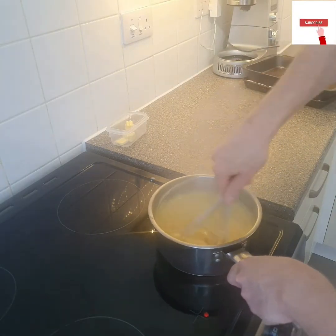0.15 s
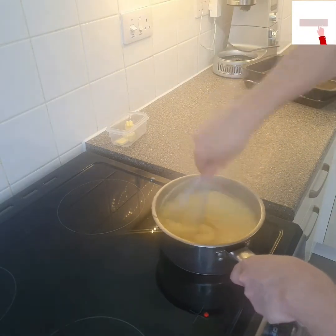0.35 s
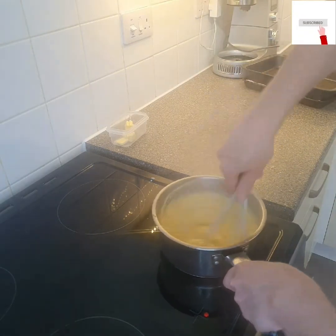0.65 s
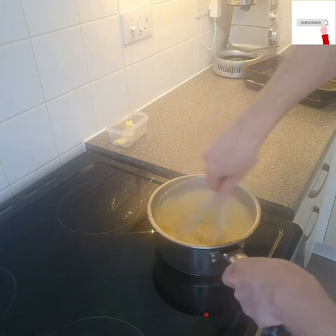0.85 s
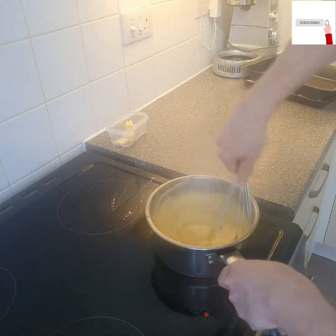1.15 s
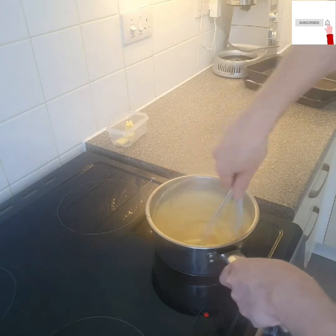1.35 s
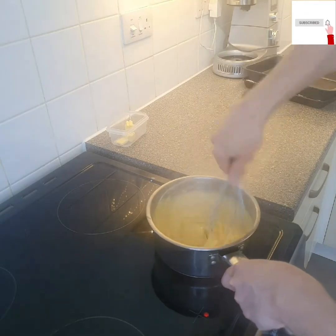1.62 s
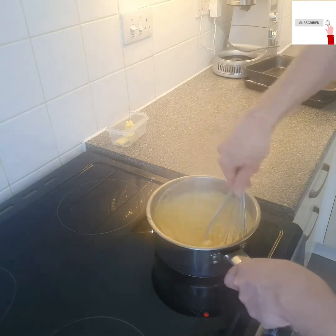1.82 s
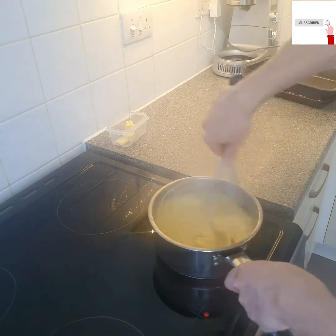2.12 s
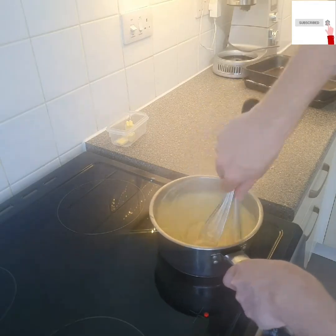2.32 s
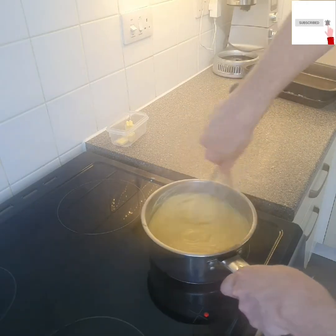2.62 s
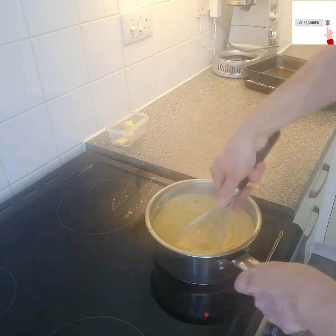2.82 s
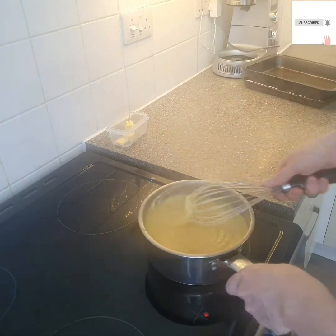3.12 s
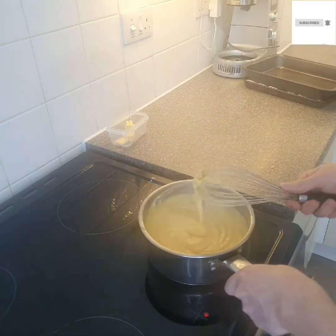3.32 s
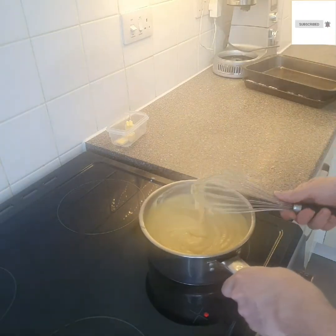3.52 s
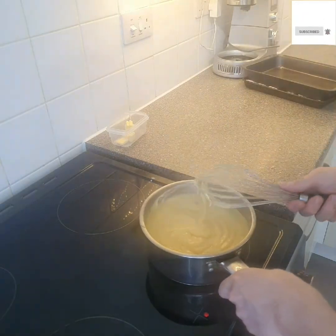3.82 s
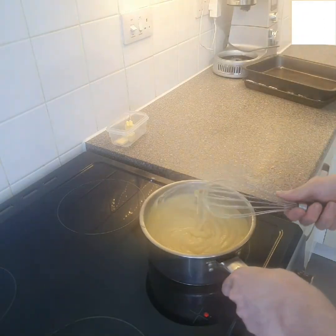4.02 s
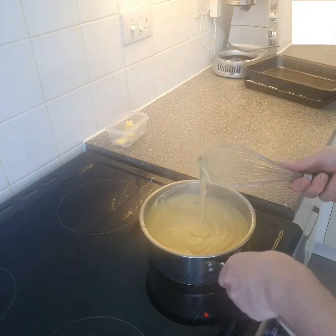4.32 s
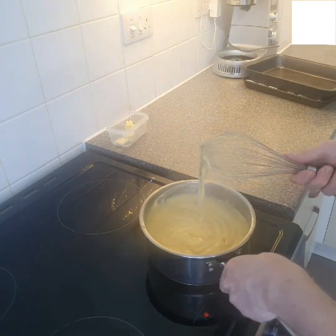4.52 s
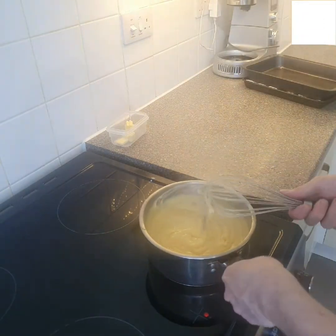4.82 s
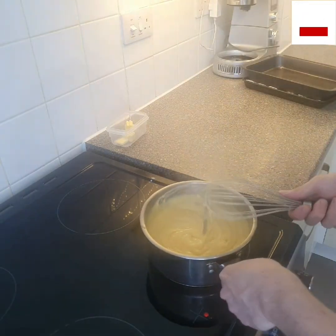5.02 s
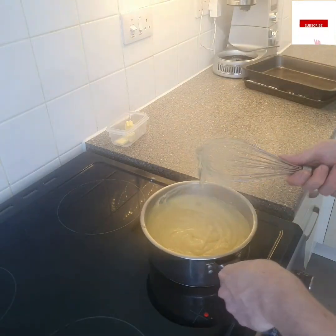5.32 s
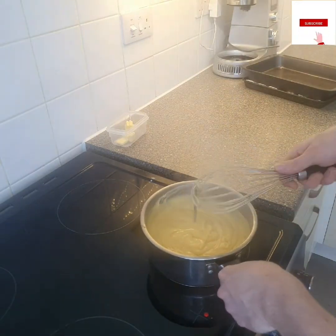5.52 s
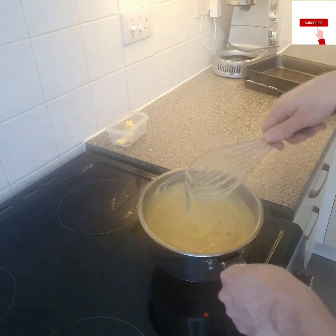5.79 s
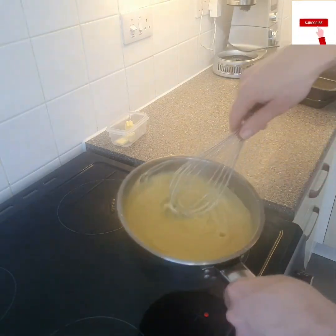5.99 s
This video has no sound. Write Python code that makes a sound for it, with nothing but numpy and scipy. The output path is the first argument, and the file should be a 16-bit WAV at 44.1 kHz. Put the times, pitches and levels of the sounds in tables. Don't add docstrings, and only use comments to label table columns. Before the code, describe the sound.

Rapid, uneven whisking comes first: bright wire clatter against a steel pan wall, scraping sweeps across its floor and a low pan hum. Then the whisk is lifted, leaving a quiet appliance drone broken by small ringing taps on the rim and heavier thuds of the pan on a glass hob, the loudest near the end. Two close microphones catch short, dense reflections from tiles and cupboards.

```python
import sys
import numpy as np
from scipy import signal
from scipy.fft import rfft, irfft, next_fast_len
from scipy.io import wavfile
from scipy.ndimage import uniform_filter1d

SR = 44100
rng = np.random.default_rng(int(sys.argv[2]) if len(sys.argv) > 2 else 0)


def store_wav(level_fs):
    pcm = np.round(np.clip(np.atleast_2d(level_fs), -1, 1) * 32767)
    wavfile.write(sys.argv[1], SR, pcm.T.astype(np.int16))


def boost_factor(decibels):
    exponent = np.asarray(decibels, float) / 20
    return 10 ** exponent


N = 271215
T = np.arange(N) / SR
SPOTS = 4
RING, SPRAY, TAIL = 4000, 5000, 20000
HOB_HZ, PAN_WALL_HZ = 198, (388, 455)
RING_RISE_S = 0.0017
LEFT_LATE = 20

# start_s, peak_db, wall_boom_db, spray_length_s
WHISK_STROKES = [(0.0502, -13, -12, 0.017), (0.177, -13.5, -15.5, 0.0082), (0.2975, -12, -14, 0.0048),
                 (0.428, -11, -17, 0.006), (0.545, -8.5, -19.5, 0.01), (0.6617, -9.5, -16.5, 0.0093),
                 (0.764, -14, -12.5, 0.031), (0.803, -18, -11.5, 0.0082), (0.8886, -9, -25, 0.018),
                 (0.996, -15.5, -10.5, 0.014), (1.026, -15, -18, 0.0078), (1.1237, -10.5, -17, 0.017),
                 (1.229, -12.5, -18, 0.043), (1.3502, -9, -24.5, 0.02), (1.4538, -11, -17.5, 0.013),
                 (1.4906, -15.5, -10, 0.0093), (1.581, -11, -27, 0.0035), (1.691, -11.5, -13.5, 0.0056),
                 (1.813, -15, -29, 0.018), (1.88, -18.5, -34, 0.0073), (1.922, -14.5, -48, 0.0031),
                 (2.047, -13, -36, 0.0052), (2.1495, -14.5, -13, 0.034), (2.309, -16, -23, 0.0086),
                 (2.333, -18.5, -13, 0.0063), (2.472, -15.5, -12.5, 0.0078), (2.7598, -17, -19, 0.047),
                 (2.789, -17.5, -44, 0.022), (2.923, -29.5, -9.5, 0.0079)]
# pitch_hz, level_db
WIRE_COLOUR = [(71, -43.5), (120, -8), (228, -10.5), (284, -0.5), (321, 2), (384, -3.5), (597, -15.5),
               (1390, 1), (1990, -13.5), (3710, -1), (4440, -3.5), (6900, -8.5), (9710, -15.5),
               (12100, -10), (14500, -19.5)]
# pitch_hz, level_db, t60_s
PAN_MODES = [(1014, -4, 0.24), (1387, -30, 0.12), (1396, 3, 0.1), (1620, -2, 0.037), (2470, -41.5, .07),
             (2550, 4, 0.13), (2960, 16, 0.014), (3196, 20.5, 0.01), (3766, 13.5, 0.019),
             (4005, -33, 0.039), (5110, -28, .06), (4610, -1, 0.049), (5100, 11, 0.051), (6250, -5, 0.024)]
# start_s, peak_db, hob_ring_db, contact_s, thump_db
PAN_KNOCKS = [
    (3.119, -20, -55.5, 0.00089, -40),
    (4.5251, -6, -51.5, 0.00017, -38),
    (5.1252, -4.5, -49, 0.000052, -38.5),
    (5.633, 4.5, -52, 0.0016, -31),
    (5.766, -0.5, -66, 0.000077, -33),
]
# full_pressure_s, scrape_db, floor_hum_db
FLOOR_PRESSES = [(0.0, -27.5, -46), (0.19, -40, -53), (0.48, -40, -40.5), (0.77, -26, -66),
                 (0.951, -28.5, -40), (1.18, -25.5, -40), (1.41, -36, -39), (1.649, -38, -51),
                 (1.9, -53, -68), (2.1, -38, -48), (2.33, -34.5, -48), (2.53, -39, -45.5), (2.82, -43, -49)]


def on_log(table, hz):
    pitch, value = np.array(table)[:, 0], np.array(table)[:, 1]
    return np.interp(np.log(hz + 1), np.log(pitch), value)


def level(x, db):
    return x * boost_factor(db) / np.sqrt(np.mean(x ** 2))


def colour(x, table, size=2048):
    gain = boost_factor(on_log(table, np.fft.rfftfreq(size, 1 / SR)))
    cepstrum = irfft(np.log(gain))
    cepstrum[1:size // 2] *= 2
    cepstrum[size // 2 + 1:] = 0
    response = irfft(np.exp(rfft(cepstrum)))
    return signal.oaconvolve(x, response)[:len(x)]


def band(x, lo_hz, hi_hz, order=2):
    return signal.sosfilt(signal.butter(order, [lo_hz, hi_hz], "band", fs=SR, output="sos"), x)


def ring(x, hz, t60):
    pole = np.exp((2j * np.pi * hz - np.log(1000) / t60) / SR)
    return signal.lfilter([1], [1, -pole], x).imag


def modes(table, count, size=1, spread=0., scatter_db=0.):
    hz, db, t60 = (np.repeat(c, size)[:, None] for c in np.transpose(table))
    chance = rng.standard_normal((len(hz), 2))
    t = np.arange(count) / SR
    line_hz = hz * (1 + spread * chance[:, :1])
    decay_db = db + scatter_db * chance[:, 1:] - 60 * t / t60
    waves = np.sin(2 * np.pi * line_hz * t) * boost_factor(decay_db)
    return waves.sum(axis=0) / np.sqrt(size)


def clicks(rate, scatter_db, count):
    hardness_db = np.minimum(scatter_db * rng.exponential(size=count), 10)
    size = boost_factor(hardness_db) * rng.choice([-1, 1], count)
    return size * (rng.random(count) < rate / SR)


def spray(length_s, rate, scatter_db, count):
    t = T[:count]
    density = np.exp(-t / max(length_s, .001)) * (1 - np.exp(-t / 0.00046))
    x = clicks(rate, scatter_db, count) * density
    x[0] = 1.11 * boost_factor(scatter_db)
    return x / np.sqrt(np.sum(x ** 2))


def swells(times, dbs, rise_s, fall_s):
    power = np.zeros(N)
    for s, db, fall in zip(times, dbs, np.broadcast_to(fall_s, len(times))):
        away = np.maximum((s - T) / max(rise_s, .001), (T - s) / max(fall, .001))
        power += boost_factor(db) ** 2 * np.exp(-2 * away)
    return np.sqrt(power)


def add(out, s, x):
    i = int(s * SR)
    out[i:i + len(x)] += x[:N - i]


def spaced(mid, side):
    gap_m = .245
    alike = np.sinc(2 * np.fft.rfftfreq(len(mid), 1 / SR) * gap_m / 343)
    m = rfft(mid) * np.sqrt((1 + alike) / 2)
    s = rfft(side) * np.sqrt((1 - alike) / 2)
    return irfft(np.array([m + s, m - s]), len(mid))


def air():
    # pitch_hz, level_db
    air_colour = [(15, -17), (25, -5), (82, -8.5), (220, -10), (348, -4), (409, -8.5), (646, -15.5),
                  (941, -11), (1110, -17), (4350, -26.5), (7660, -42.5), (12800, -39), (15400, -35.5)]
    # pitch_hz, gain_db
    hiss_dip = [(7000, 7.5), (7400, -10), (10000, -10), (11200, 5)]
    # start_s, rumble_db, fall_s
    cooker_jolts = [
        (0.2, -45, 0.18),
        (1.37, -46, .04),
        (1.76, -40.5, 0.052),
        (2.899, -44, 0.039),
        (3.49, -52.5, 0.38),
        (3.78, -51, 0.067),
        (4.0, -58.5, 0.5),
        (4.78, -53.5, 0.45),
        (5.65, -45.5, 0.14),
    ]
    hiss = spaced(*(colour(colour(rng.standard_normal(N), air_colour), hiss_dip) for _ in range(2)))
    hiss = hiss * boost_factor(-60.5) / np.std(band(hiss[0], 130, 15000))
    s, db, fall_s = np.transpose(cooker_jolts)
    shake_db, lift_s, rest_db = -51, 2.93, -68
    steady = boost_factor(shake_db) * np.exp(-np.maximum(T - lift_s, 0) / 0.23) + boost_factor(rest_db)
    shake = np.hypot(steady, swells(s, db, rise_s=0.022, fall_s=fall_s))
    mid, side = band(rng.standard_normal((2, N)), 64.7, 111.3, order=3)
    rumble = level(mid + boost_factor(-13) * side * np.array([[1], [-1]]), -1.5)
    return hiss + rumble * shake


def echoes(first_s=0.0021, wet_db=12):
    # pitch_hz, t60_s
    kitchen_t60 = [(150, 0.31), (500, 0.42), (1500, 0.38), (4000, 0.37), (12000, 0.35)]
    t = T[:TAIL]
    echo = spaced(*rng.standard_normal((2, TAIL)))
    tail = 0
    for hz in 60 * 2. ** np.arange(9):
        decay = boost_factor(-60 * t / on_log(kitchen_t60, hz))
        tail = tail + band(echo, hz / 2 ** .5, hz * 2 ** .5) * decay
    onset = np.clip((t - first_s) / 0.00099, 0, 1)
    tail = tail * onset * (1 + 5.5 * np.exp(-t / 0.0022))
    return signal.unit_impulse(TAIL) + tail * boost_factor(wet_db) / np.sqrt(np.sum(tail ** 2) / 2)


def thumps():
    # pitch_hz, level_db, t60_s
    pan_base = [(450, 5, 0.031), (254, -11, 0.03), (82, -20, 0.16)]
    out = np.zeros(N)
    for s, _, hob_db, contact_s, thump_db in PAN_KNOCKS:
        base = []
        for hz, db, t60 in pan_base:
            dulling_db = 20 * np.log10(1 + 2 * np.pi * hz * contact_s)
            base.append((hz, thump_db + db - dulling_db, t60))
        add(out, s, modes(base, count=RING))
        add(out, s + 0.00705, modes([(HOB_HZ, hob_db, .45)], count=TAIL, size=2, spread=0.026))
    return out


def knocks():
    # pitch_hz, level_db
    knock_colour = [(71, -46), (120, -4), (440, -9), (1270, -8.5), (1580, -5.5), (1940, -17.5), (2280, -6),
                    (6300, -17), (8200, -36), (13600, -41), (15400, -62)]
    out = np.zeros((SPOTS, N))
    click = colour(signal.unit_impulse(RING), knock_colour)
    for k, (s, db, _, contact_s, _) in enumerate(PAN_KNOCKS):
        push = np.exp(-T[:RING] / contact_s)
        push = push + 0.15 * np.roll(push, int(0.00216 * SR))
        add(out[k % SPOTS], s, boost_factor(db + 13.5) * signal.fftconvolve(push / push.sum(), click))
    return out


def taps():
    # start_s, peak_db, extra_wire_hz, extra_wire_db, grip_number
    rim_taps = [
        (3.4768, -19.5, 2950, -1, 0),
        (3.7255, -26.5, 3112, 5, 0),
        (4.001, -23, 2460, 0.5, 0),
        (4.7312, -18, 2100, -4, 1),
        (4.987, -21, 2277, -7, 1),
        (6.073, -25.5, 2370, 12, 2),
    ]
    # pitch_hz, level_db, t60_s
    grip_wires = [
        [(437, -3, 0.063), (884, -12.5, 0.6), (1037, -14.5, 0.75), (1360, 3.5, 0.03), (2410, -6.5, 0.32),
         (2647, 7.5, 0.12), (3112, 2.5, 0.26), (3323, 0.5, 0.19), (3640, 4.5, 0.1), (5220, 4, 0.036),
         (5650, -6, 0.13), (6450, -35, 0.16)],
        [(447, -9, 0.1), (818, -7.5, 0.45), (1100, -37, 0.17), (1525, -14.5, 0.22), (2370, 2.5, 0.09),
         (2590, 8.5, 0.065), (3260, -3, 0.35), (3204, 1.5, 0.27), (3660, -3.5, 0.2), (4230, -21, 0.55),
         (5160, 0, 0.1), (6083, -41, 0.22)],
        [(810, 13, 0.037), (1354, 7.5, 0.33), (2680, 9, 0.13), (2256, 10, .1), (3290, 11, 0.17),
         (4360, -3, 0.038), (5250, -3.5, 0.26), (5300, 0, 0.34), (6450, -7.5, 0.13)],
    ]
    # pitch_hz, level_db
    crack_colour = [(120, -16.5), (200, -21), (336, -10), (448, -22), (714, -25), (870, -10), (1880, -20),
                    (2500, -5.5), (2890, -6), (3220, -15), (3780, -16), (3990, -16.5), (5310, -17),
                    (8030, -24.5), (14500, -26)]
    rim_spot = 1
    out = np.zeros((SPOTS, N))
    cracks = [colour(signal.unit_impulse(2 * RING), c) for c in (crack_colour, crack_colour, WIRE_COLOUR)]
    for s, db, extra_hz, extra_db, grip in rim_taps:
        hit = boost_factor(db) * spray(0.005, rate=2200.0, scatter_db=0.0, count=SPRAY)
        table = [(hz, d, 0.62 * t60) for hz, d, t60 in grip_wires[round(grip)]]
        table = table + [(extra_hz, extra_db, .13)]
        wires = modes(table, count=2 * RING, size=5, spread=0.01444, scatter_db=4.0)
        wires = wires + modes([(HOB_HZ, -12, .3)], count=2 * RING)
        rise = 1 - np.exp(-T[:2 * RING] / RING_RISE_S)
        add(out[rim_spot], s, signal.fftconvolve(hit, boost_factor(34) * cracks[round(grip)]))
        add(out[rim_spot], s, boost_factor(db - 14.0) * wires * rise)
    return out


def pan_floor():
    s, _, floor_db = np.transpose(FLOOR_PRESSES)
    waver = level(uniform_filter1d(rng.standard_normal((2, N)), size=2500), 0)
    floor_hz = 288 * (1 + 0.0093 * waver[0])
    phase = 2 * np.pi * np.cumsum(floor_hz) / SR
    hum = swells(s, floor_db, rise_s=0.056, fall_s=0.067)
    return hum * boost_factor(4.0 + 0.72 * waver[1]) * np.sin(phase)


def pressure():
    # time_s, steady_drag_db
    arm_effort = [(0.0, -39), (0.3, -41.5), (0.7, -40), (1.4, -35.5), (1.9, -36.5), (2.4, -43.5),
                  (2.66, -35.5), (2.85, -47), (3.0, -64)]
    s, db, _, _ = np.transpose(WHISK_STROKES)
    press_s, scrape_db, _ = np.transpose(FLOOR_PRESSES)
    steady = boost_factor(np.interp(T, *np.transpose(arm_effort), right=-120))
    slide_rise_s = 0.0085
    slide = swells(s + slide_rise_s, db - 17, slide_rise_s, fall_s=0.05)
    sweep = swells(press_s, scrape_db, rise_s=0.023, fall_s=0.031)
    return np.sqrt(steady ** 2 + slide ** 2 + sweep ** 2)


def ticks(bearing):
    snap = level(clicks(90., 5.0, N), -3.5) * bearing
    snap = colour(snap, WIRE_COLOUR)
    return np.array([np.roll(snap, LEFT_LATE), snap])


def drag(bearing):
    s, db, boom_db, _ = np.transpose(WHISK_STROKES)
    wall = swells(s + .02, db + boom_db - 7.5, rise_s=0.0097, fall_s=0.017)
    wall = wall + boost_factor(-19.5) * bearing
    gust = level(uniform_filter1d(rng.standard_normal(N), size=700), 0)
    grit = level(clicks(9000., 3.8, N), 0) * boost_factor(1.2 * gust)
    body = boost_factor(18.0) * colour(signal.unit_impulse(RING), WIRE_COLOUR)
    body = body + boost_factor(-37.5) * modes(PAN_MODES, count=RING, size=4, spread=0.03)
    spot = rng.integers(SPOTS, size=N) == np.arange(SPOTS)[:, None]
    out = level(signal.oaconvolve(grit * spot, body[None], axes=1)[:, :N], -8.5) * bearing
    out[1] += wall * level(sum(ring(grit, hz, 0.086) for hz in PAN_WALL_HZ), -9.5)
    out[2] += bearing * level(ring(grit, HOB_HZ, 0.14), -18)
    return out


def strokes():
    # start_s, pitch_hz, level_db
    rim_notes = [(0.0528, 1364, -0.5), (0.177, 1482, 1.5), (0.2989, 1368, 9.5), (0.7642, 1244, -1),
                 (1.003, 1090, -4), (1.231, 1490, -11), (1.4587, 990, -6), (1.69, 1447, -0.5),
                 (1.922, 1040, -3.5), (2.1522, 1420, -1), (2.471, 1308, -1), (2.7906, 1561, -1.5)]
    out = np.zeros((SPOTS, N))
    click = colour(signal.unit_impulse(RING), WIRE_COLOUR)
    rise = 1 - np.exp(-T[:RING] / RING_RISE_S)
    for k, (s, db, boom_db, length_s) in enumerate(WHISK_STROKES):
        angle = [(hz, 2.5 * rng.standard_normal()) for hz in 500 * 1.55 ** np.arange(8)]
        near = min(rim_notes, key=lambda row: abs(row[0] - s))
        if abs(near[0] - s) < .01:
            note_hz, note_db = near[1:]
        else:
            note_hz, note_db = 1357 * (1 + 0.38 * rng.standard_normal()), -31.5
        hit = boost_factor(db) * spray(0.85 * length_s, rate=4000., scatter_db=5.0, count=SPRAY)
        pan = boost_factor(-32) * modes(PAN_MODES, count=RING, size=3, spread=.03, scatter_db=5.0)
        note = modes([(note_hz, note_db, .07)], count=RING, size=2, spread=0.014)
        boom = modes([(hz, boom_db + 0.5, .05) for hz in PAN_WALL_HZ], count=RING, spread=0.068)
        place = out[k % SPOTS]
        add(place, s, signal.fftconvolve(hit, boost_factor(24.0) * colour(click, angle) + pan))
        add(place, s, boost_factor(db - 9.5) * note * rise)
        add(place, s + 0.0016, boost_factor(db - 1.0) * boom)
    return out


def scene():
    bearing = pressure()
    spots = boost_factor(-9.5) * (strokes() + drag(bearing) + taps() + knocks())
    paths = np.array([echoes() for _ in spots])
    paths[:, 0] = np.roll(paths[:, 0], LEFT_LATE, axis=1)
    size = next_fast_len(N + TAIL)
    spectrum = np.sum(rfft(spots, size)[:, None] * rfft(paths, size), axis=0)
    kitchen = irfft(spectrum, size)[:, :N]
    return kitchen + ticks(bearing) + pan_floor() + thumps() + air()


def top_cut(x):
    return signal.sosfilt(signal.butter(12, 15850, fs=SR, output="sos"), x)


def record(dry):
    # pitch_hz, gain_db
    overall_colour = [(450, -2.5), (650, 8), (1000, -3), (1400, 1.5), (2000, 0), (7000, 1), (7900, -12),
                      (9200, -6.5), (10500, 1.5)]
    # pitch_hz, left_minus_right_db
    port_tilt = [(80, -2.5), (400, 1.3), (1200, -1.5), (2400, 1), (3600, -0.5), (4600, -4.5), (5400, 21.5),
                 (6500, 2), (8300, 14), (9300, 8), (10500, -7.5), (13000, 2)]
    left = colour(colour(dry[0], overall_colour), [(hz, db / 2) for hz, db in port_tilt])
    right = colour(colour(dry[1], overall_colour), [(hz, -db / 2) for hz, db in port_tilt])
    heard = band(np.array([left, right]), 52, 18000)
    heard = signal.sosfilt(signal.ellip(8, .5, 45, 14650, fs=SR, output="sos"), heard)
    return top_cut(heard)


dry = scene()
out = record(dry)
store_wav(out)
```